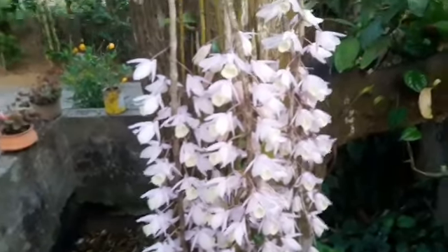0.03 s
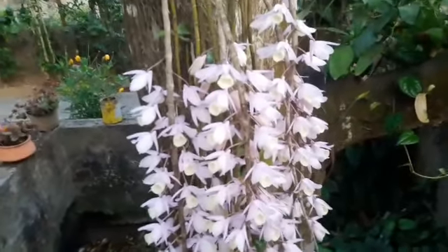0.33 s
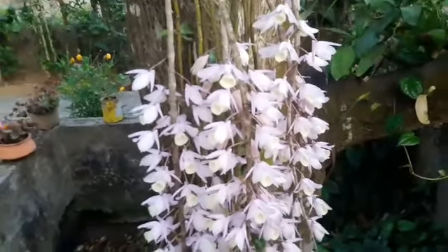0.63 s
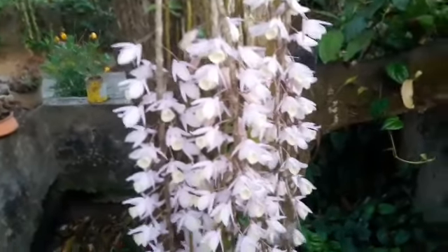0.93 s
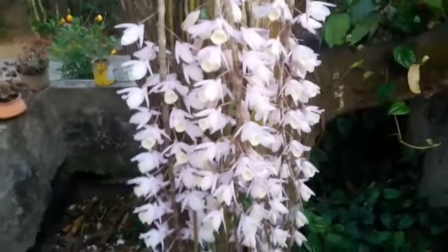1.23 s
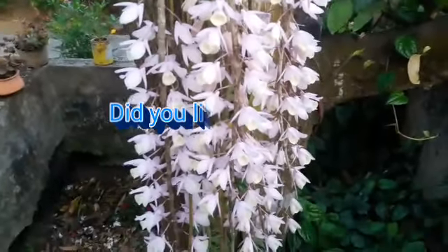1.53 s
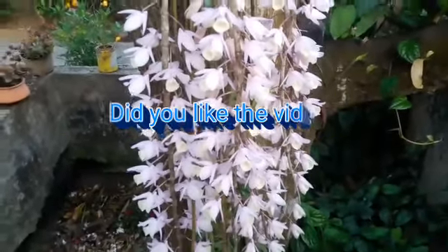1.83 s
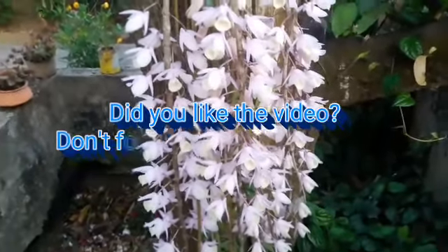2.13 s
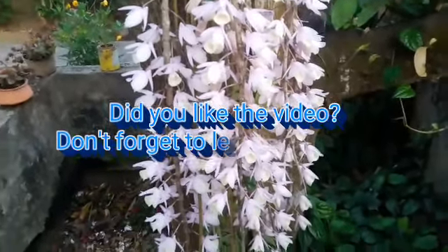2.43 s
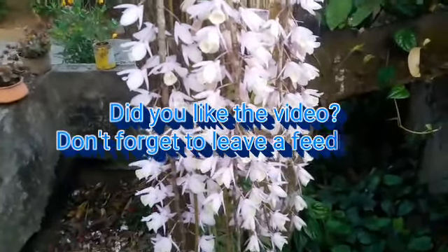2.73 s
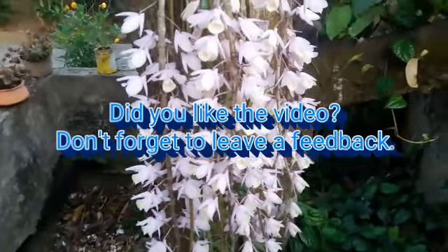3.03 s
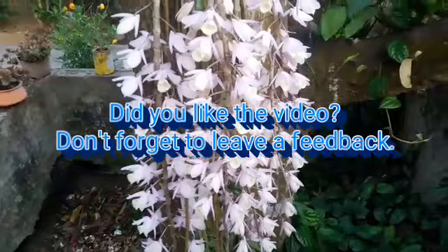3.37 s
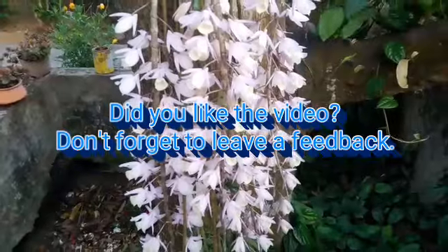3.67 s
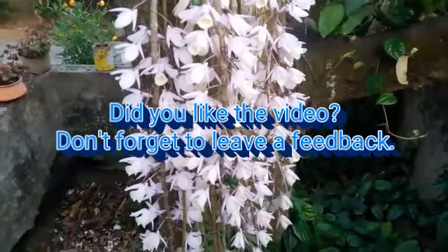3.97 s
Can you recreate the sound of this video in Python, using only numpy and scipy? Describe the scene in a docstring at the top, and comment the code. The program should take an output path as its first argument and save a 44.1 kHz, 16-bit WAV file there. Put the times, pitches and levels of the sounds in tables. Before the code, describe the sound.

A bird gives long swooping whistles that end in warbles, the last with a falling rasp. Another scolds in harsh clacks. Two sharp ticks and soft brushing sound close by midway, over faint hiss in a lightly echoing garden.

```python
"""Birds in a walled garden

One bird gives long swooping whistles, frequency-modulated tones that end in a warble or a falling rasp.
Another scolds in harsh chacks, pulses and noise shaped by its throat. The whistler's rough overtones and
a few faint chips sound as thin glides; walls and trees reflect all the calls. Leaves and insects hiss
over a low rumble, a hum and two dull booms; close by there are two sharp ticks and a soft brushing."""
import sys
import numpy as np
from scipy import signal
from scipy.fft import rfft, irfft, next_fast_len
from scipy.io import wavfile
from scipy.ndimage import map_coordinates

SR = 44100
rng = np.random.default_rng(int(sys.argv[2]) if len(sys.argv) > 2 else 0)


def output_pcm(signal):
    """Save a mono or channel-first signal as 16-bit PCM at the path in sys.argv[1].

    Samples are clipped to [-1, 1] before scaling.
    """
    pcm = np.clip(np.atleast_2d(signal).T, -1, 1) * 32767
    wavfile.write(sys.argv[1], SR, np.round(pcm).astype(np.int16))


N = 176400

# Spectra of the noises and ticks. Each row: frequency in Hz, relative level in dB.
RUMBLE_SPECTRUM = [(25, -30), (55, -9.5), (85, 1), (120, -5.5), (170, 2), (300, -4), (700, -7.5),
                   (1000, -11.5), (4000, -100)]
LEAF_SPECTRUM = [(500, -25), (1000, 0), (2200, 0), (3100, -3), (4000, -12), (5300, -15), (6200, -24),
                 (10000, -25), (15500, -27)]
INSECT_SPECTRUM = [(6400, -19.5), (7450, 0), (8000, -7), (8500, -2.5), (9000, -14.5), (12500, -100)]
BRUSH_SPECTRUM = [(300, -32), (1500, -1), (3500, -5.5), (6400, -8), (8600, 2), (10000, -5.5), (15500, -13)]
TICK_SPECTRUM = [(400, -23), (1800, -2), (6000, -2.5), (9000, 6.5), (15000, 0)]
# Reverberation of the trees. Each row: frequency in Hz, time to fall 60 dB in seconds.
TREE_T60 = [(300, 0.25), (1400, 1.71), (8000, 1.34)]
# Each row: start in seconds, pitch in Hz, level in dB, time to fall 60 dB in seconds.
DISTANT_BOOMS = [(0, 78.5, -49.5, 0.92), (1.296, 88.7, -53, 0.72)]
# Each row: start in seconds, peak level in dB, treble cut in dB per octave.
NEAR_TICKS = [(1.652, -23, 3.5), (2.128, -21, 5)]
# Each row: start in seconds, length in seconds, level in dB.
BRUSH_STROKES = [(1.584, .08, -63.5), (2.099, .3, -69), (2.268, .19, -49), (2.415, 0.37, -57)]
# First and last are the whistler's rough overtones: a grainy tone at the start, a thin line within the
# rasp. Between them are faint chips. Each row: start and length in seconds, first and last pitch in Hz,
# level in dB, jitter as a fraction of the pitch.
THIN_GLIDES = [(0, 0.17, 1638, 1790, -54.5, .1), (.69, 0.066, 2550, 2223, -56.5, 0.03),
               (0.905, 0.08, 5200, 5600, -61, 0.02), (1.174, 0.088, 4000, 4350, -62.5, 0.043),
               (1.662, 0.085, 4420, 4820, -62.5, .03), (2.963, 0.024, 2066, 2120, -57, .01),
               (3.094, 0.069, 2125, 2090, -55, 0.016)]
# The scolder's throat. Each row: frequency in Hz, relative gain in dB.
THROAT_RESPONSE = [(500, -28), (1200, -6.5), (2200, -16), (2550, 3.5), (2980, 5), (3400, -5.5), (4200, -10),
                   (4700, -19.5), (5500, -22.5), (6300, -39), (15000, -66)]
# Each row: start in seconds, level in dB, pitch in Hz, roughness ratio, treble lift in dB per octave.
SCOLD_CHACKS = [(-.05, -46.5, 579, 0.71, 4), (.166, -44.5, 577, 0.72, 6), (.384, -43.5, 598, 1, 8.5),
                (.599, -44, 633, 0.89, 10), (.818, -44.5, 612, 0.79, 8.5), (1.263, -46, 593, 0.83, 7.5),
                (1.501, -45.5, 591, 1.03, 5.5), (1.777, -50, 614, 0.74, 2.5), (1.98, -44, 593.3, 1.01, 4),
                (2.19, -47.5, 627.7, 0.61, 7), (3.182, -56.5, 648, 0.95, 27.5),
                (3.413, -52.5, 645, 0.83, 25), (3.623, -50, 624, 0.46, 19.5), (3.828, -50.5, 636, 0.2, 18)]
# One contour per whistle. Each row: time in seconds, pitch in Hz, level in dB, warble depth in Hz.
WHISTLE_CONTOURS = [
    [(-.1, 1362, -52, 20), (.15, 1252, -54.5, 38)],
    [(.208, 1229, -42, 4.5), (.3, 1386, -45, 12), (.34, 1396, -45.5, 50), (.4, 1335, -48, 76),
     (.555, 1385, -48.5, 79), (.58, 1350, -42, 9.2)],
    [(1.372, 1420, -41.5, 8.2), (1.44, 1319, -47.5, 6), (1.58, 1312, -45, 6), (1.72, 1465, -39, 23),
     (1.8, 1441, -38.5, 46), (1.82, 1351, -50, 104), (1.97, 1374, -47, 96)],
    [(2.71, 1473, -42, 5.4), (2.785, 1350, -43.5, 6.2), (2.88, 1328, -41.5, 8.3), (3, 1433, -45, 20),
     (3.07, 1509, -38, 23), (3.15, 1442, -42, 90), (3.33, 1425, -54, 96)],
]
# Each row: time in seconds, pitch in Hz, level in dB.
RASP_CONTOUR = [(3.06, 1067, -55), (3.11, 1125, -48), (3.19, 1119, -52), (3.26, 1012, -53.5),
                (3.34, 872, -61)]


def amp(db):
    """Amplitude ratio of a level in decibels."""
    return 10 ** (np.asarray(db) / 20)


def unit(x):
    """Normalisation to rms 1."""
    return x / np.sqrt(np.mean(x ** 2) + 1e-20)


def along(points, hz):
    """Interpolation on a logarithmic frequency axis."""
    f, v = np.transpose(points)
    return np.interp(np.log(hz + 1), np.log(f + 1), v)


def wobble(rate, size):
    """Smooth random modulation with rate knots a second."""
    return map_coordinates(rng.standard_normal(size // 16 + 8), [np.arange(size) * rate / SR + 2],
                           mode="wrap")


def filtered(x, gain):
    """Zero-phase filtering: the spectrum is multiplied by gain(frequency)."""
    m = next_fast_len(len(x) + 4096)
    return irfft(rfft(x, m) * gain(np.fft.rfftfreq(m, 1 / SR)), m)[:len(x)]


def noise(spectrum, size):
    """White noise filtered to a spectrum, at rms 1."""
    return unit(filtered(rng.standard_normal(size), lambda hz: amp(along(spectrum, hz))))


def phase(hz):
    """Phase is the time integral of frequency."""
    return 2 * np.pi * np.cumsum(hz) / SR


def clock(length):
    """Sample times in seconds."""
    return np.arange(int(length * SR)) / SR


def gesture(rows):
    """Linear interpolation of a contour: start time, soft-edged gate and one curve per column."""
    times, *columns = np.transpose(rows)
    t = clock(times[-1] - times[0])
    gate = np.clip(np.minimum(t, t[-1] - t) / 0.0039, 0, 1)
    return times[0], gate, [np.interp(t + times[0], times, c) for c in columns]


def add(out, start, x):
    """Superposition of x on out from start seconds."""
    i = round(start * SR)
    x = x[max(-i, 0):N - i]
    out[max(i, 0):][:len(x)] += x


def garden(x, tail_db=0, early_t60=0.7, wall_s=0.057):
    """Convolution with the direct path, a wall echo, nearby scatter and a long tail from the trees."""
    t = clock(1)
    early = rng.standard_normal(len(t)) * amp(-60 * t / early_t60)
    hz, frame_s, bands = signal.stft(rng.standard_normal(len(t)), SR, nperseg=256)
    decay = amp(-60 * frame_s / along(TREE_T60, hz)[:, None])
    late = signal.istft(bands * decay, SR, nperseg=256)[1][:len(t)]
    response = amp(-2) * early / np.linalg.norm(early) + amp(tail_db - 4.5) * late / np.linalg.norm(late)
    response[round(wall_s * SR)] += amp(-9)
    response[0] += 1
    return signal.fftconvolve(x, response)[:N]


def rumble():
    """Outdoor air: noise with its power at low frequencies."""
    return amp(-59) * noise(RUMBLE_SPECTRUM, N)


def leaves():
    """Leaves hiss as steady broadband noise."""
    return amp(-62.5) * noise(LEAF_SPECTRUM, N)


def insects():
    """Insects merge into a high band of noise with slight amplitude modulation."""
    return amp(-66 + 0.9 * wobble(60, N)) * noise(INSECT_SPECTRUM, N)


def hum(hz=296):
    """A faint tone wavers by slow modulation of level and frequency."""
    return amp(-67.5 + 5.5 * wobble(4.17, N)) * np.sin(phase(hz + 2 * wobble(8, N)))


def booms(attack_s=0.0021):
    """Each distant boom is a low, exponentially damped sinusoid."""
    out = np.zeros(N)
    t = np.arange(N) / SR
    for start, hz, db, t60 in DISTANT_BOOMS:
        envelope = amp(db - 60 * t / t60) * (1 - np.exp(-t / attack_s))
        add(out, start, envelope * np.sin(2 * np.pi * hz * t))
    return out


def ticks(decay_s=.00004):
    """A very brief impulse has a broad spectrum and is heard as a sharp tick."""
    out = np.zeros(N)
    t = clock(.01) - .005
    impulse = (t > 0) * np.exp(-np.abs(t) / decay_s)
    for start, db, cut_db in NEAR_TICKS:
        snap = filtered(impulse, lambda f: amp(along(TICK_SPECTRUM, f) - cut_db * np.log2(f + 500)))
        add(out, start + t[0], amp(db) * snap / np.abs(snap).max())
    return out


def brushing():
    """Friction noise swells and fades with each soft stroke."""
    out = np.zeros(N)
    for start, length, db in BRUSH_STROKES:
        progress = clock(length) / length
        add(out, start, amp(db) * np.sin(np.pi * progress) ** 2 * noise(BRUSH_SPECTRUM, len(progress)))
    return out


def thin_glides():
    """Each rough overtone or faint chip is a short linear frequency sweep with jitter."""
    out = np.zeros(N)
    for start, length, first_hz, last_hz, db, jitter in THIN_GLIDES:
        progress = clock(length) / length
        hz = (first_hz + (last_hz - first_hz) * progress) * (1 + jitter * wobble(400, len(progress)))
        add(out, start, amp(db) * np.sqrt(np.sin(np.pi * progress)) * np.sin(phase(hz)))
    return out


def beak_squeak(t, jitter_hz, centre_hz=1986.5, swing_hz=126, length_s=0.0241):
    """A rough tone sweeps upward in frequency as the beak opens."""
    opening = np.minimum(t / length_s, 1)
    hz = centre_hz + swing_hz * (2 * opening - 1 + wobble(jitter_hz, len(t)))
    return amp(-49.5) * np.sin(np.pi * opening) * np.sin(phase(hz))


def scolder(attack_s=0.0091, hold_s=0.025, release_s=0.024, jitter_hz=497):
    """Source and filter: jittery pulses and puffs of noise excite the throat's resonances, then echo."""
    out = np.zeros(N)
    t = clock(hold_s + 4 * release_s)
    envelope = (1 - np.exp(-t / attack_s)) * np.exp(-np.maximum(t - hold_s, 0) / release_s)
    scoop = 1 - 0.198 * np.exp(-t / 0.0061)  # the pitch starts low and rises quickly
    for start, db, hz, rough, lift_db in SCOLD_CHACKS:
        cycle = phase(hz * scoop * (1 + rough * 0.0423 * wobble(jitter_hz, len(t))))
        pulses = unit(sum(np.cos(k * cycle + rng.normal()) for k in range(1, 17)))
        puffs = unit(rng.standard_normal(len(t)) * (1 + np.cos(cycle)))
        throat = lambda f: amp(along(THROAT_RESPONSE, f) + lift_db * np.log2(np.clip(f, 2500, 7500)))
        voice = unit(filtered(pulses + rough * puffs, throat))
        chack = amp(db) * voice * envelope + beak_squeak(t, jitter_hz)
        add(out, start, garden(chack, tail_db=1))  # this bird sits deeper in the trees
    return out


def rasp(jitter_hz=332, opens_db_per_s=48):
    """Fast random modulation roughens a falling voice under the last whistle; its overtone gains."""
    out = np.zeros(N)
    start, gate, (hz, db) = gesture(RASP_CONTOUR)
    n = len(gate)
    cycle = phase(hz * (1 + 0.07 * wobble(jitter_hz, n)))
    voice = np.sin(cycle) + amp(-8.5 + opens_db_per_s * np.arange(n) / SR) * np.sin(2 * cycle)
    flutter = 1 + .45 * wobble(jitter_hz, n)
    add(out, start, gate * amp(db) * voice * flutter)
    return out


def whistler(warble_hz=26.5, attack_s=.018, db_per_hz=.033, flutter_db=1.8):
    """A pure tone swells in and swoops; deepening frequency modulation turns it into a warble."""
    out = np.zeros(N)
    for contour in WHISTLE_CONTOURS:
        start, gate, (hz, db, depth_hz) = gesture(contour)
        n = len(gate)
        swing_hz = depth_hz * np.sin(phase(warble_hz * (1 + .06 * wobble(warble_hz, n))))
        swell = 1 - np.exp(-np.arange(n) / SR / attack_s)
        level_db = db + db_per_hz * swing_hz + flutter_db * wobble(109.7, n)  # louder atop each swing
        add(out, start, gate * swell * amp(level_db) * np.sin(phase(hz + swing_hz)))
    return out


def scene():
    """Mid-side stereo: the birds reverberate, the rest is dry, and only the rumble has a little width."""
    birds = garden(whistler() + rasp(), tail_db=-2.5)  # the whistler sits in the open
    birds += scolder() + garden(thin_glides())
    mid = birds + ticks() + brushing() + rumble() + leaves() + insects() + hum() + booms()
    side = amp(-20) * rumble()
    return np.array([mid + side, mid - side])


def record(dry, top_hz=15600):
    """Band limiting: an ideal low-pass filter removes the highest treble."""
    return np.array([filtered(channel, lambda hz: hz < top_hz) for channel in dry])


dry = scene()
out = record(dry)
output_pcm(out)
```